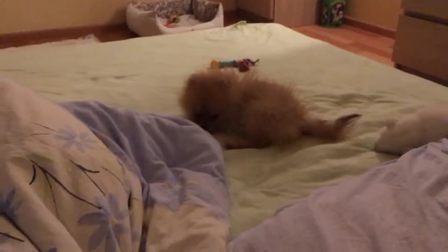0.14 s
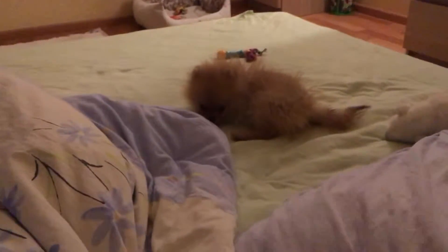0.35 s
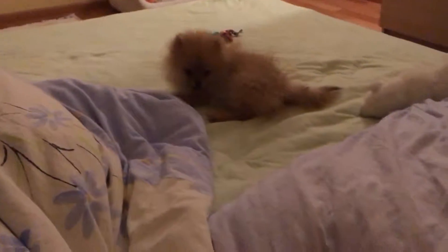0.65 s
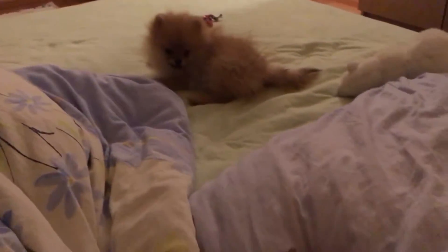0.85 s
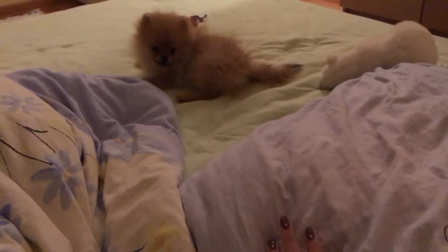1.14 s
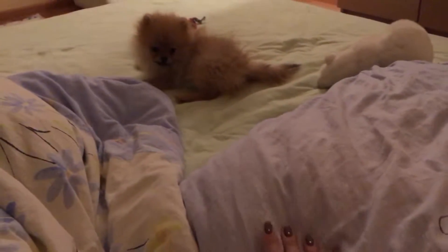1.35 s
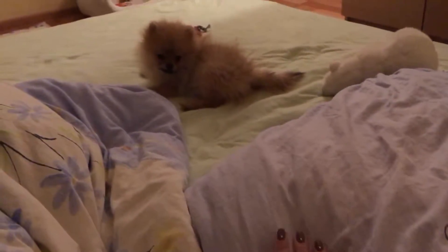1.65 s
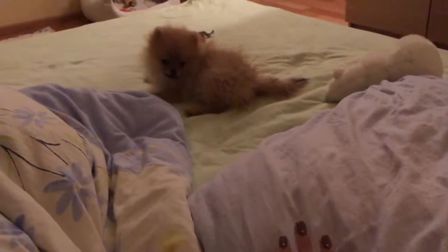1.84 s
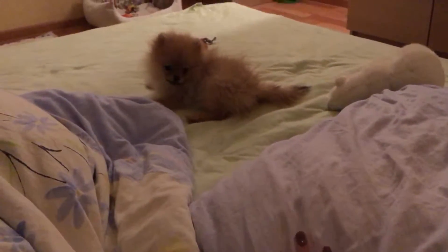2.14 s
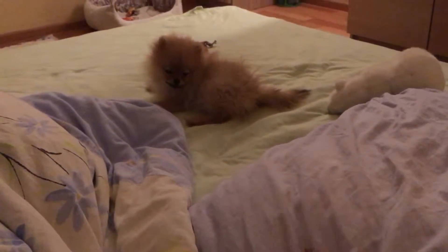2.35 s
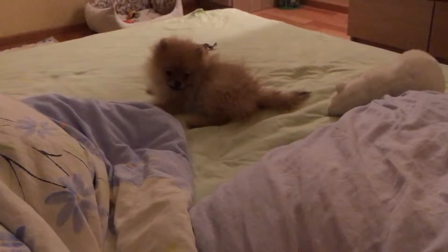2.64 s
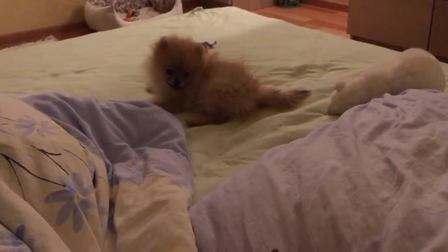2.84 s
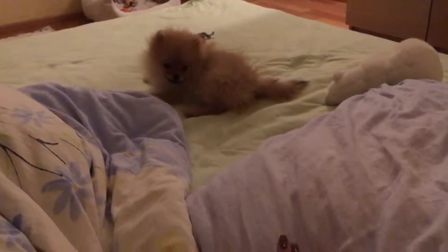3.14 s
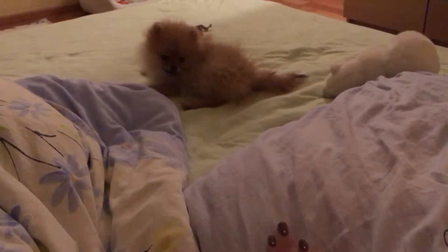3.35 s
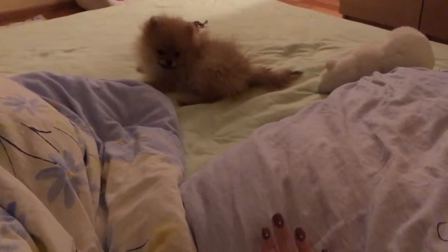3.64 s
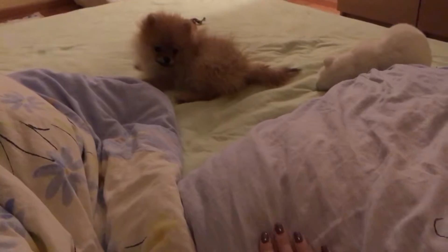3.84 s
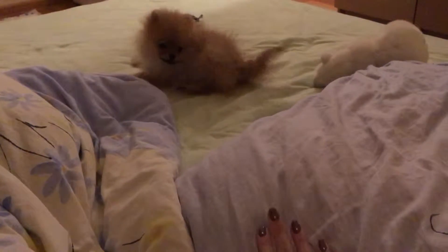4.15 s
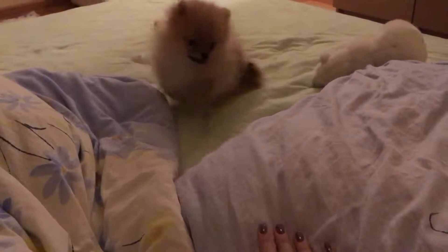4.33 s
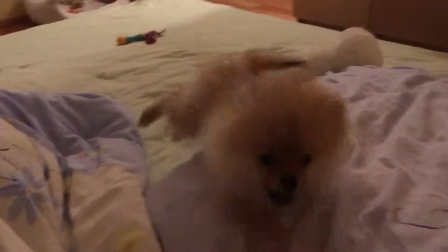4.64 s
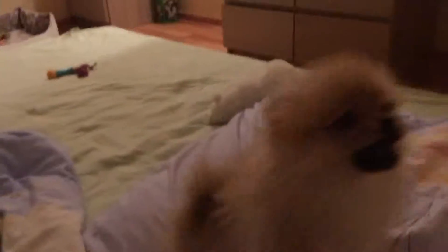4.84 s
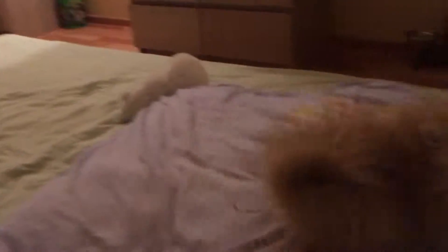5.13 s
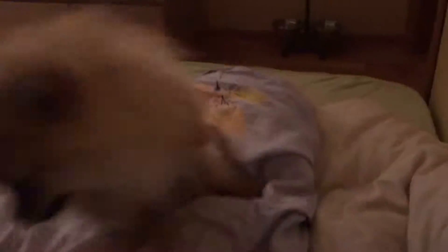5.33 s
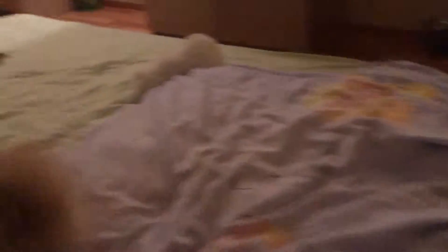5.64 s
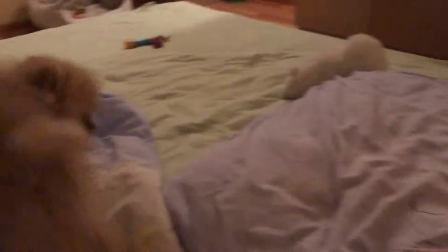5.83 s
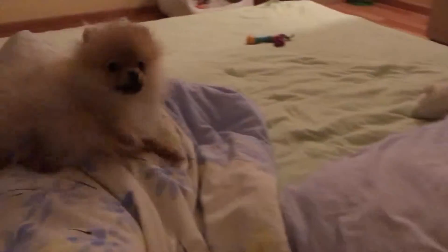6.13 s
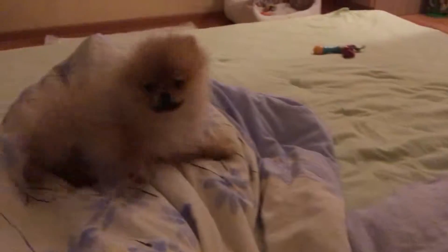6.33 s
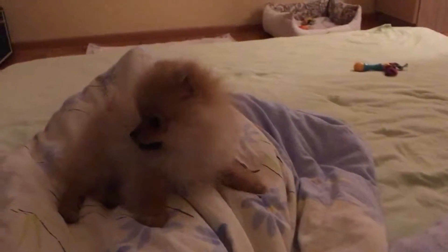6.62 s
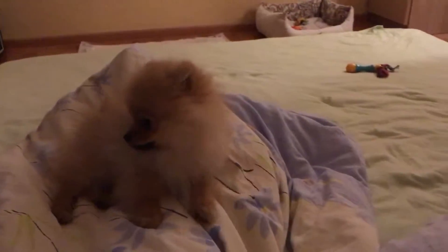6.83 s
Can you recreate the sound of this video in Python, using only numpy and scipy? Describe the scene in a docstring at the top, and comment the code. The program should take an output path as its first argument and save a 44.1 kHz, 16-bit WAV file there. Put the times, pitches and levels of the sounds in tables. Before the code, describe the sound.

A small puppy yaps once, loud, high and close, while scrambling over a bed indoors. Before that come a short bump against the microphone and about three seconds of muffled, even finger taps on a duvet. The puppy's run brings padded paw thuds, light claw scratches and rustling bedding on both sides of the yap, then dies down to faint room hiss.

```python
"""A soft thud on bedding and one knock on the camera body, in a quiet room. Fingers tap a duvet to
tease a small puppy: dull ticks over mattress thuds. The puppy bounds across the bed, claws catching,
cloth sliding. It gives one shrill, close yap and scrambles on. In the yap the vocal folds sweep
up, break into rasp and fall as the mouth shuts; the room rings on."""
import sys
import numpy as np
from scipy import signal
from scipy.fft import rfft, irfft, next_fast_len
from scipy.io import wavfile
from scipy.ndimage import map_coordinates

SR = 44100
rng = np.random.default_rng(int(sys.argv[2]) if len(sys.argv) > 2 else 0)


def put_to_file(sound):
    """Save the sound as 16-bit audio at rate SR, in the file named by the first command-line argument."""
    columns = np.atleast_2d(sound).T  # one column per channel
    safe = np.clip(columns, -1, 1)
    whole_steps = np.round(safe * 32767)
    wavfile.write(sys.argv[1], SR, whole_steps.astype(np.int16))


N = 307818
TIME = np.arange(N) / SR
EDGE_HZ = 15750

# still-room spectra (frequency [Hz], gain [dB])
HISS_EQ = [(20, -15), (60, 2.5), (120, -9), (175, -15), (300, -13.5), (480, -23), (850, -25), (2300, -30),
           (3000, -33), (4800, -35), (9000, -38), (15500, -41)]
RUMBLE_EQ = [(31, -26), (62, 0), (85, -10), (112, -7), (170, -20), (300, -21), (600, -42), (3000, -70)]
# diffuse decay (frequency [Hz], T60 [s])
TAIL_DECAY = [(200, 0.5), (900, 0.29), (1600, .5), (4000, 0.85), (6000, 0.84), (14000, 1.43)]
# diffuse spectrum (frequency [Hz], gain [dB])
TAIL_EQ = [(200, 8.5), (1000, -2.5), (1600, 0.5), (2500, -10.5), (4000, -7), (4700, -7.5), (7000, -1.5),
           (14000, -8.5)]
# lingering room bands (centre [Hz], width [Hz], relative level [dB], T60 [s])
TAIL_BANDS = [(1590, 18, -0.5, 1.1), (1996, 170, -8.5, 1.3), (2529, 55, 5.5, 1.3), (3484, 230, -9.5, 1.3),
              (3924, 150, -11.5, 1.6)]
# short delayed repeats of the yap (delay [s], gain [dB])
YAP_REPEATS = [(.012, -33), (0.026, -17.5), (.066, -18.5), (.108, -25.5)]
# dulling of the repeats (frequency [Hz], gain [dB])
REPEAT_EQ = [(1800, 1.5), (2500, -6.5), (4000, -1.0), (12000, -16)]

# body sliding on bedding (middle [s], length [s], level [dB], swish centre [Hz], swish boost [dB])
BODY_SLIDES = [(4.86, .64, -57.5, 1900, 1), (5.45, 0.44, -58, 3540, 16.5), (5.653, 0.47, -59, 1990, -6),
               (5.976, 0.29, -60.5, 2980, 0.5), (6.21, 0.22, -63, 2060, 7), (6.35, .25, -73, 3400, 14)]
# cloth friction spectrum (frequency [Hz], gain [dB])
CLOTH_EQ = [(100, -11.5), (300, -4), (550, -11), (1000, -11), (2400, -14.5), (3200, -18), (5000, -25.5),
            (9000, -27.5), (15000, -33.5)]
# claws catching in cloth (time [s], peak [dB], centre [Hz])
CLAW_SNAPS = [(4.6991, -38.5, 2850), (4.757, -31.5, 2100), (4.902, -37.5, 2562), (5.4155, -41, 7440),
              (6.209, -42.5, 2850)]
# snap spectrum (frequency / centre [ratio], gain [dB])
SNAP_EQ = [(.25, -14), (.5, -4), (1, 0), (2, -13), (5, -25)]
# claws crossing the weave (time [s], relative level [dB], length [s])
CLAW_SCRATCHES = [(4.836, -45.5, 0.031), (5.23, -49, 0.067), (5.553, -52.5, 0.047), (5.652, -57, 0.023)]
# scratch spectrum (frequency [Hz], gain [dB])
SCRATCH_EQ = [(500, -23.5), (2000, -3), (3500, 1), (8000, -2.5), (10500, -10), (14000, -4)]
# soft thuds on the bedding: paw steps, and a low bump after the knock
# (time [s], relative scuff level [dB], relative thud level [dB], second contact delay [s])
BED_THUDS = [(0.212, -52, -47, .02), (0.536, -64, -45, .023), (4.572, -49, -38, .05),
             (4.702, -44, -42, .06), (4.772, -30, -38, .018), (4.869, -41, -35, .055),
             (5.165, -34, -38, .06), (5.335, -52, -48, .025), (5.516, -42, -34, .015),
             (5.575, -39, -41, .03), (5.672, -44, -35, .042), (5.801, -44, -41, .039),
             (5.909, -51, -51, .02), (6.484, -63, -52, .02)]
# crushed cloth spectrum (frequency [Hz], gain [dB])
SCUFF_EQ = [(60, -1), (200, 1), (400, -5.5), (800, -18.5), (1500, -24.5), (4000, -40), (15000, -55)]
# duvet taps (time [s], relative level [dB], tilt above the knee [dB/octave], first finger lead [s])
FINGER_TAPS = [(1.401, -42, 1, 0), (1.725, -56, -4, 0.052), (2.017, -54.5, 2.5, 0.027),
               (2.341, -45, 4, 0.036), (2.627, -42, 4, 0.00083), (2.921, -49, -3, 0.027),
               (3.229, -52.5, 3, 0.038), (3.531, -57.5, -10, 0), (3.829, -55, 0, 0.056),
               (4.116, -49.5, -4.5, 0.044), (4.401, -48, -10, 0.0043)]
# fingertip tick spectrum (frequency [Hz], gain [dB])
TICK_EQ = [(60, -7), (250, 15.5), (650, 3), (1200, -18.5), (2500, -34), (6000, -61), (15000, -66)]

# contacts within the knock (time [s], relative level [dB])
KNOCK_CONTACTS = [(0.3968, -17.5), (0.4016, -16), (.4055, -1)]
# modes of camera body and hand (frequency [Hz], relative level [dB], T60 [s])
CAMERA_MODES = [(99.2, -16, 0.12), (140, -19, 0.048), (236, -25.5, 0.036), (343, -23.5, 0.045),
                (553, -23, 0.031)]
# contact click spectrum (frequency [Hz], gain [dB])
CLICK_EQ = [(100, 0.5), (600, 8), (1000, 0.5), (1900, -0.5), (3500, -5), (5000, -17.5), (10000, -24.5),
            (15000, -41)]

# throat and wide-open mouth response (frequency [Hz], gain [dB])
TRACT_EQ = [(300, -49), (820, -33), (1050, -18.5), (1260, -6), (1580, 2), (1780, -11.5), (2020, -4),
            (2330, -12), (3000, -13.5), (4400, -12.5), (5000, -30), (5900, -30), (8600, -47),
            (11500, -61.5), (14000, -44)]
# mouth rung by the glottal pop (frequency [Hz], gain [dB])
POP_EQ = [(500, -35.5), (1500, -15), (1900, 0), (2400, -18.5), (5200, -24.5), (7000, -42.5),
          (15000, -54.5)]

YAP_S, CLIMB_S, FALL_S = 5.0835, .072, .085
START_HZ, TOP_HZ, LAST_HZ, SAG_HZ_PER_S = 336.2, 826.6, 293, 7500
EFFORT_DB, ONSET_DB, ATTACK_S, RELEASE_DB = -5, -21, .061, -45.5
CATCH_DB, CATCH_S, BREAK_S = -6, .005, .0011
ROUGH_START, ROUGH_HELD, ROUGH_BREAK = .3, .05, .62
START_SETTLE_S, BREAK_SETTLE_S = .015, .054
MOUTH_START, MOUTH_BREAK, MOUTH_END = .79, .97, .44  # scales tract resonances; 1 = wide open


def amp(db):
    """Decibels to gain."""
    return 10 ** (np.asarray(db) / 20)


def unit(x):
    """Scale to rms 1."""
    return x / np.sqrt(np.mean(x ** 2) + 1e-20)


def peaked(x):
    """Scale to peak 1."""
    return x / abs(x).max()


def read(points, hz):
    """Interpolate a table over log frequency."""
    f, value = np.transpose(points)
    return np.interp(np.log(hz + 1), np.log(f + 1), value)


def add(mix, at_s, sound):
    """Mix a sound in at at_s."""
    part = mix[max(round(at_s * SR), 0):][:len(sound)]
    part += sound[:len(part)]


def colour(x, eq, size=4096):
    """Minimum-phase filter with spectrum eq."""
    log_gain = np.log(amp(read(eq, abs(np.fft.fftfreq(size, 1 / SR)))))
    taps = np.fft.ifft(np.exp(np.conj(signal.hilbert(log_gain)))).real
    return signal.fftconvolve(x, taps[:size // 2])


def drift(count, rate_hz):
    """Smooth random motion, rms about 1."""
    knots = rng.standard_normal(4096)
    return map_coordinates(knots, [np.arange(count) * 2 * rate_hz / SR], order=3, mode="wrap")


def burst(decay_s):
    """Decaying noise."""
    t = TIME[:SR // 5]
    return rng.standard_normal(len(t)) * np.exp(-t / decay_s)


def click(eq, noise, decay_s):
    """Filtered impulse plus noise burst, peak 1."""
    return peaked(colour(signal.unit_impulse(SR // 5) + noise * burst(decay_s), eq))


def room_tone(hiss_db=-63, rumble_db=-62, waver_db=3):
    """Faint steady hiss over a wavering rumble."""
    hiss = unit(colour(rng.standard_normal(N), HISS_EQ)[:N])
    rumble = unit(colour(rng.standard_normal(N), RUMBLE_EQ)[:N])
    return amp(hiss_db) * hiss + amp(rumble_db + waver_db * drift(N, 5.2)) * rumble


def reverb(x, tail_db, rings_db, onset_s=.019):
    """Diffuse tail: each band decays at its own rate, a few narrow ones linger."""
    hz, t, noise = signal.stft(rng.standard_normal(SR), SR, nperseg=2048)
    level = amp(read(TAIL_EQ, hz)[:, None] - 60 * t / read(TAIL_DECAY, hz)[:, None])
    for centre_hz, width_hz, db, t60_s in TAIL_BANDS:
        band = np.exp(-((hz[:, None] - centre_hz) / width_hz) ** 2)
        level += band * amp(db + rings_db - 60 * t / t60_s)
    tail = signal.istft(noise * level, SR, nperseg=2048)[1][:SR]
    tail *= 1 - np.exp(-(TIME[:SR] / onset_s) ** 2)
    return amp(tail_db) * signal.fftconvolve(x, tail / np.linalg.norm(tail))[:N]


def repeats(x):
    """Short delayed copies, quieter and duller."""
    dulled, out = colour(x, REPEAT_EQ), np.zeros(N)
    for delay_s, db in YAP_REPEATS:
        add(out, delay_s, amp(db) * dulled)
    return out


def bedding(crinkle_db=-10, crinkles_per_s=400, swish_octaves=.24):
    """Cloth slides on cloth: swells of crinkly hiss, each with its own swish band."""
    crinkles = (rng.random(N) < crinkles_per_s / SR) * rng.standard_normal(N)
    hiss = unit(colour(rng.standard_normal(N) + amp(crinkle_db) * unit(crinkles), CLOTH_EQ)[:N])
    size, out = next_fast_len(N), np.zeros(N)
    spectrum, hz = rfft(hiss, size), np.fft.rfftfreq(size, 1 / SR)
    for middle_s, length_s, db, swish_hz, swish_db in BODY_SLIDES:
        swish = amp(swish_db * np.exp(-(np.log2((hz + 1) / swish_hz) / swish_octaves) ** 2))
        swell = np.maximum(1 - (2 * (TIME - middle_s) / length_s) ** 2, 0) ** .64
        out += amp(db) * swell * irfft(spectrum * swish, size)[:N]
    pressure = amp(1.3 * drift(N, 18))
    return pressure * out


def claws(scratch_gain_db=-2):
    """Claws snap on the cloth and scratch over its threads."""
    out = np.zeros(N)
    for at_s, db, centre_hz in CLAW_SNAPS:
        eq = [(ratio * centre_hz, gain_db) for ratio, gain_db in SNAP_EQ]
        add(out, at_s, amp(db) * peaked(colour(burst(.0024), eq)))
    for at_s, db, length_s in CLAW_SCRATCHES:
        count = int(length_s * SR)
        threads = rng.standard_normal(count) * amp(3 * drift(count, 900)) * np.hanning(count) ** .5
        add(out, at_s, amp(db + scratch_gain_db) * colour(unit(threads), SCRATCH_EQ))
    return out


def mattress_thud(median_hz, spread, rise_s):
    """A soft push: a few low cycles of random pitch swell and die."""
    t = TIME[:SR // 5]
    hz = median_hz * np.exp(spread * rng.standard_normal())
    return t / rise_s * np.exp(1 - t / rise_s) * np.sin(2 * np.pi * hz * t)


def bed_thuds(gain_db=2, second_db=-2.5):
    """Paw steps and a low bump after the knock: scuff and thud twice, the second softer."""
    out = np.zeros(N)
    for first_s, scuff_db, thud_db, delay_s in BED_THUDS:
        for at_s, contact_db in (first_s, 0), (first_s + delay_s, second_db):
            scuff = peaked(colour(burst(.02), SCUFF_EQ))
            thud = mattress_thud(median_hz=82, spread=.15, rise_s=.01)
            add(out, at_s, amp(scuff_db + contact_db) * scuff)
            add(out, at_s, amp(thud_db + contact_db) * thud)
    return amp(gain_db) * out


def fingers(tick_gain_db=3, tick_lag_s=.002, knee_hz=394, lead_db=-3, usual_tap_db=-48):
    """Each fingertip gives a dull tick and a thud; a leading finger lands softer."""
    out = np.zeros(N)
    for tap_s, db, tilt_db, lead_s in FINGER_TAPS:
        thud_db = -42 + .3 * (db - usual_tap_db)  # takes only a share of extra strength
        eq = [(hz, gain_db + tilt_db * max(np.log2(hz / knee_hz), 0)) for hz, gain_db in TICK_EQ]
        landings = [(tap_s, 0), (tap_s - lead_s, lead_db)] if lead_s > tick_lag_s else [(tap_s, 0)]
        for at_s, finger_db in landings:
            tick = click(eq, noise=.13, decay_s=.0027)
            thud = mattress_thud(median_hz=88, spread=.26, rise_s=.0061)
            add(out, at_s + tick_lag_s, amp(db + finger_db + tick_gain_db) * tick)
            add(out, at_s, amp(thud_db + finger_db) * thud)
    return out


def knock(click_db=-16, scatter_db=-41, ring_lag_s=.00188):
    """A brief rattle of contacts rings the camera body; near surfaces scatter the clicks."""
    t, out = TIME[:SR // 3], np.zeros(N)
    ring = sum(amp(db - 60 * t / t60_s) * np.sin(2 * np.pi * hz * t) for hz, db, t60_s in CAMERA_MODES)
    for at_s, db in KNOCK_CONTACTS:
        add(out, at_s + ring_lag_s, -amp(db) * ring)
        add(out, at_s, amp(db + click_db) * click(CLICK_EQ, noise=.18, decay_s=.0012))
        add(out, at_s, amp(db + scatter_db) * peaked(colour(burst(.055), CLICK_EQ)))
    return out


def yap_gesture(t):
    """Pitch, effort, roughness, mouth opening: the voice climbs, catches, breaks and falls."""
    climb_left, fall_s = np.maximum(1 - t / CLIMB_S, 0), np.maximum(t - CLIMB_S, 0)
    broken = np.minimum(fall_s / BREAK_S, 1)
    hz = np.maximum(TOP_HZ - (TOP_HZ - START_HZ) * climb_left ** 2 - SAG_HZ_PER_S * fall_s, LAST_HZ)
    attack_db = ONSET_DB * np.maximum(1 - t / ATTACK_S, 0) ** 2
    catch_db = CATCH_DB * np.exp(-((t - CLIMB_S) / CATCH_S) ** 2)
    release_db = RELEASE_DB * (fall_s / FALL_S) ** 1.305
    rough = ROUGH_HELD + ROUGH_START * np.exp(-t / START_SETTLE_S)
    rough += ROUGH_BREAK * broken * np.exp(-fall_s / BREAK_SETTLE_S)
    mouth = 1 - (1 - MOUTH_START) * climb_left ** 2 - (1 - MOUTH_BREAK) * broken
    mouth -= (MOUTH_BREAK - MOUTH_END) * (fall_s / FALL_S) ** 2
    return hz, EFFORT_DB + attack_db + catch_db + release_db, np.clip(rough, 0, 1), mouth


def vocal_folds(hz, cycles, rough, mouth, half_db=-2, shimmer_db=4):
    """Harmonics shaped by the tract; roughness adds flutter and period-doubling lines between them."""
    count = len(hz)
    out = np.zeros(count)
    for k in np.arange(2, 60) / 2:
        strength = amp(half_db) * rough if k % 1 else 1 - .5 * rough
        tract = amp(read(TRACT_EQ, k * hz / mouth)) * (k * hz < EDGE_HZ)
        flutter = 1 + .94 * rough * drift(count, 150)
        # upper partials swell and fade independently
        shimmer = amp(shimmer_db * np.clip(k - 2, 0, 1) * (np.tanh(drift(count, 55)) * 1.5 - .3))
        smear_rad = .03 * k * drift(count, 300)
        partial = np.sqrt(2) * np.cos(2 * np.pi * k * cycles + k * k + smear_rad)
        out += strength * tract * flutter * shimmer * partial
    return out


def yap(rasp_db=-7, air_db=-31, chest_db=-37, pop_db=-23):
    """The glottis pops open, the folds puff air each cycle, the chest passes a weak fundamental."""
    t = np.arange(0, CLIMB_S + FALL_S, 1 / SR)
    hz, effort_db, rough, mouth = yap_gesture(t)
    jitter = (.004 + .051 * rough) * drift(len(t), 248.9)
    cycles = np.cumsum(hz * (1 + jitter)) / SR
    folds = vocal_folds(hz, cycles, rough, mouth)
    puffs = rng.standard_normal(SR)[:len(t)] * (1 + .7 * np.cos(2 * np.pi * cycles))
    air = (amp(rasp_db) * rough + amp(air_db)) * unit(colour(puffs, TRACT_EQ)[:len(t)])
    fade = np.clip((CLIMB_S + FALL_S - t) / FALL_S, 0, 1)
    chest = amp(chest_db) * fade * np.sqrt(2) * np.sin(2 * np.pi * cycles)
    out = np.zeros(N)
    add(out, YAP_S, (amp(effort_db) * (folds + air) + chest) * signal.windows.tukey(len(t), .03))
    add(out, YAP_S, amp(pop_db) * click(POP_EQ, noise=.074, decay_s=.0025))
    return out


def scene():
    """Mono mix: yap, knock and bed contacts reverberate; only the yap has delayed repeats."""
    voice, bump = yap(), knock()
    contacts = fingers() + bed_thuds() + claws()
    tails = repeats(voice) + reverb(voice, tail_db=-18.5, rings_db=-2)
    tails += reverb(bump, tail_db=-21, rings_db=-19) + reverb(contacts, tail_db=-17, rings_db=-6.5)
    return (voice + bump + contacts + tails + bedding() + room_tone())[None]


def record(dry):
    """Microphone: 38 Hz high-pass, full-scale limit, low-pass at EDGE_HZ."""
    thinned = signal.sosfilt(signal.butter(2, 38, "highpass", fs=SR, output="sos"), dry)
    limited = np.clip(thinned, -1, 1)
    lowpass = signal.firwin(511, EDGE_HZ, window=("kaiser", 9), fs=SR)
    return signal.oaconvolve(limited, lowpass[None], "same")


dry = scene()
out = record(dry)
put_to_file(out)
```